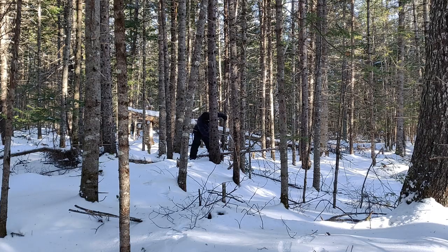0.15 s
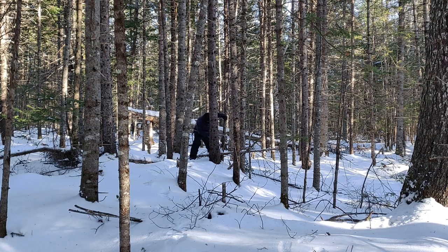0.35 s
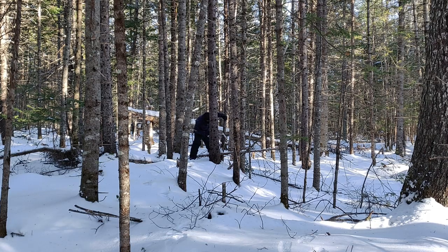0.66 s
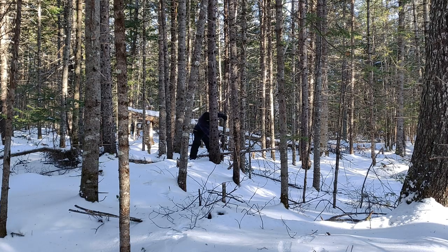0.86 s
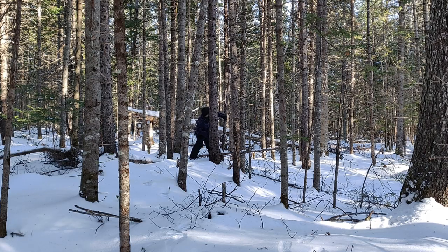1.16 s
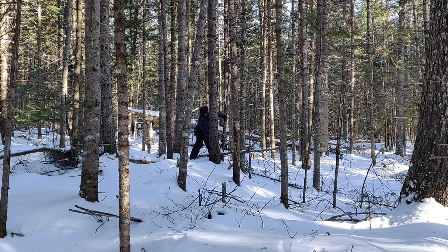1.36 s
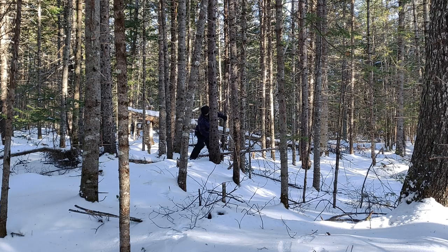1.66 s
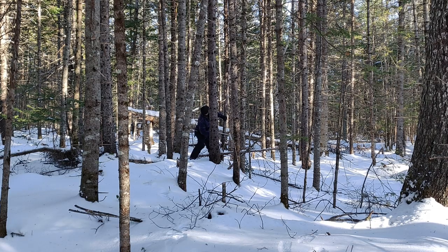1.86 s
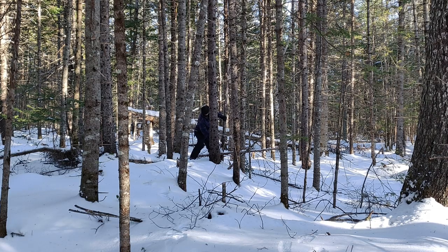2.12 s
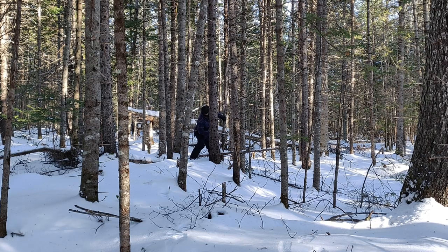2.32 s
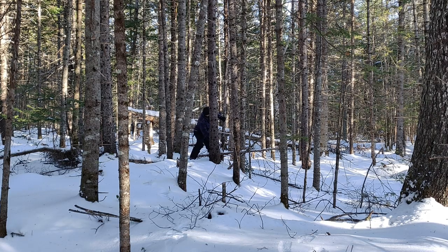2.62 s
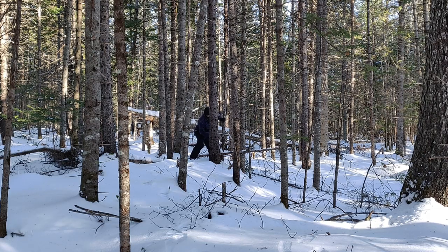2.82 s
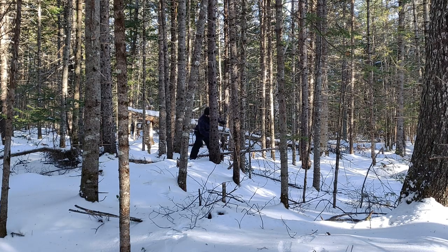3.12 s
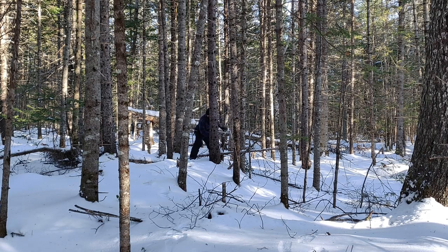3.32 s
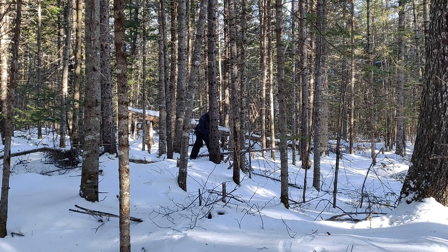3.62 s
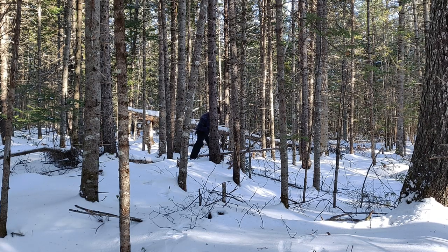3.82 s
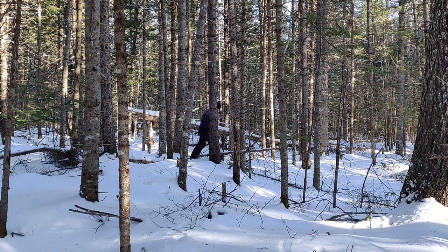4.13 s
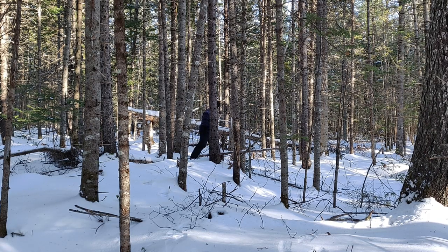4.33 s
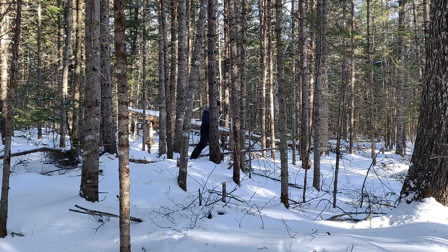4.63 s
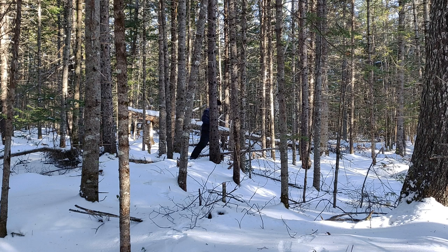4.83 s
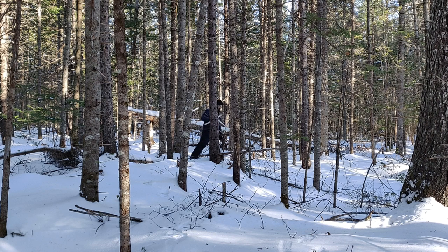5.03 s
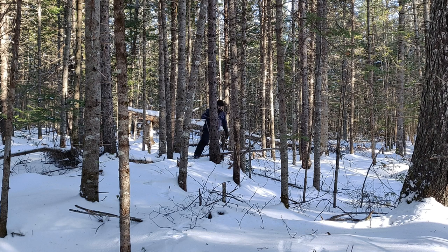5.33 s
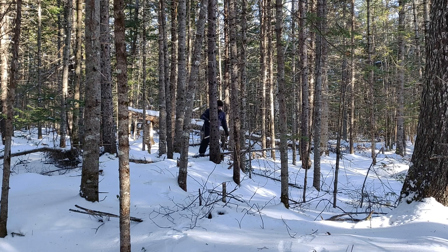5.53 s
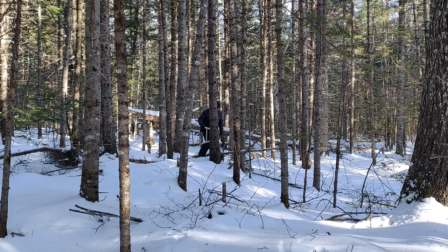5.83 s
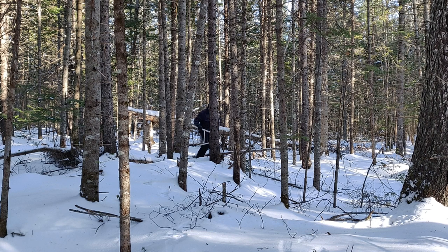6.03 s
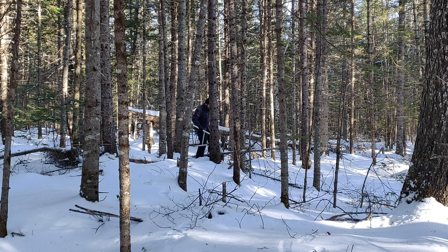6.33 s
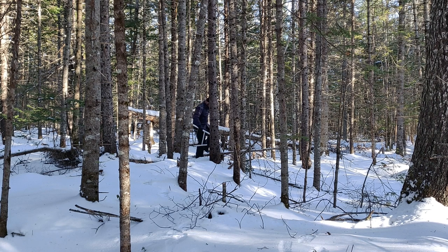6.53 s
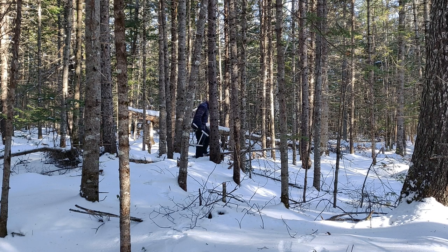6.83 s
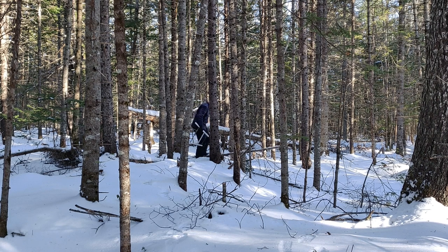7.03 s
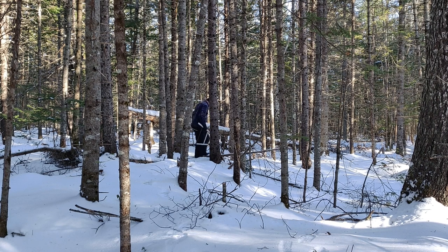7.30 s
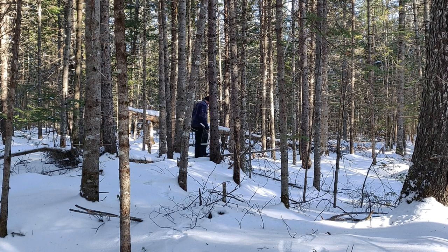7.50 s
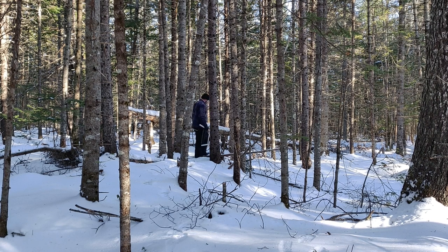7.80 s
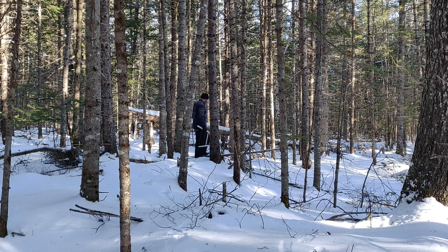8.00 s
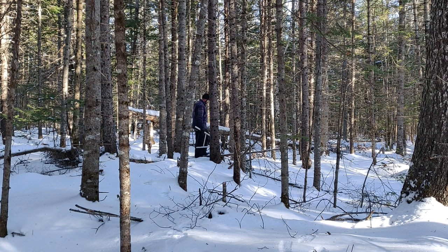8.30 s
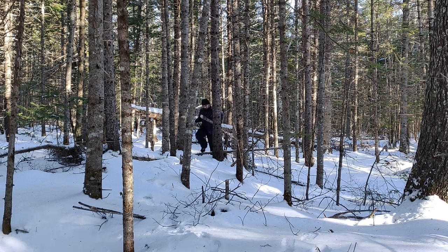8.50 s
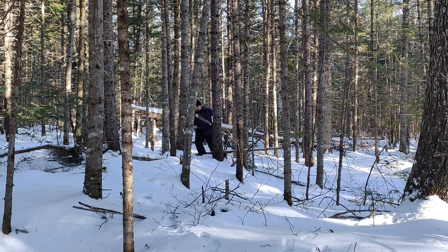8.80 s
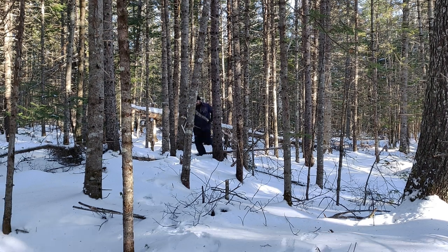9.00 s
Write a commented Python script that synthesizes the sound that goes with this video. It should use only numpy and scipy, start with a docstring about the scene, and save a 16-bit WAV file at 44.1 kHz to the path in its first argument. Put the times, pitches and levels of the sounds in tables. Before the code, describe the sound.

In a snowy wood, sawing gives way to sharp cracks, a brief creak, a crackling treefall with low thuds, then sparse snow crunches and brushing.

```python
"""A snowy wood, with someone some way off sawing through a thin dead tree in quick strokes of many small fractures.
Fibres snap as short clicks with a ringing splinter; the hinge creaks through the modes of the stem.
The crown crashes through dry branches in bursts of grains and thuds into the snow on decaying ground modes.
Later a piece drops on the crust and boots crunch about. Trunks scatter the sounds back as echoes of noise,
over a faint rush of far-off air; two small microphone ports ring in the treble."""
import sys
import numpy as np
from scipy import signal
from scipy.fft import rfft, irfft, next_fast_len
from scipy.io import wavfile
from scipy.ndimage import uniform_filter1d

SR = 44100
rng = np.random.default_rng(int(sys.argv[2]) if len(sys.argv) > 2 else 0)


def bounce(signal):
    """Save signal as a 16-bit WAV file at the path given by the first command-line argument."""
    frames = np.transpose(np.atleast_2d(signal))
    limited = np.clip(frames, -1, 1)
    pcm = np.round(limited * 32767).astype(np.int16)
    wavfile.write(sys.argv[1], SR, pcm)


N = 403515
T = np.arange(N) / SR  # seconds

# Levels throughout are relative: filters, mixing gains and the microphone come after them.
# Far-off air in the wood. Each row: frequency in Hz, level in dB.
AIR_SPECTRUM = [(20, -33), (45, -36.5), (90, -47), (200, -48), (300, -50.5), (500, -51.5), (1000, -58.5),
                (2000, -70.5), (4000, -89), (6200, -76.5), (16000, -56.5)]

# Saw cycles, a light return stroke and then the cut.
# Each row: start in seconds, return level in dB, cut level in dB.
SAW_CYCLES = [(0.192, -52.5, -45.5), (0.613, -51, -46.5), (1.025, -54.5, -48), (1.442, -56, -52),
              (1.877, -57.5, -53), (2.297, -59, -50), (2.67, -79, -52)]
# Blade and stem under the teeth. Each row: frequency in Hz, gain in dB.
SAW_SPECTRUM = [(100, -32.5), (330, -6.5), (550, -6), (760, 1), (960, -8), (1270, -2), (1500, -6),
                (1850, -3), (3150, -17), (3900, -13.5), (4600, -10.5), (6200, -8.5), (8500, -7.5),
                (16000, -11.5)]
# Resonances of the stem under the saw. Each row: frequency in Hz, width in Hz, gain in dB.
STEM_RESONANCES = [(453, 64, -15), (720, 27, -25), (1230, 60, -4.5), (1600, 69, -3.5), (1810, 25, -28),
                   (2420, 170, -14.5), (3980, 33, -0.5)]
RETURN_RISE_S, RETURN_FALL_S = 0.045, 0.17
CUT_AFTER_S, CUT_RISE_S, CUT_FALL_S = 0.21, 0.097, 0.086
RUB_DB, RUB_FADE_DB_PER_S, RUB_LEAST_DB = -57.5, 5.5, -64.5  # the blade rubs less as the cut opens
ONSET_S, RELEASE_DB_PER_S = 0.0064, 188  # of all rubbing, bending and wading

# Snapping wood. Each row: start in seconds, burst level in dB, woody body in dB,
# splinter pitch in Hz, splinter level in dB; body and splinter are relative to the burst.
WOOD_SNAPS = [(1.0519, -34.5, -13.5, 1600, -4), (1.4254, -26, -24.5, 3830, -4),
              (1.75, -24.5, -19.5, 1780, 4), (2.1004, -29.5, -21, 1820, 1), (2.149, -15.5, -19, 1890, 3),
              (2.3708, -32.5, -31, 1680, -10), (2.511, -15.5, -19, 1600, -4), (2.7618, -29, -20, 4800, 7),
              (2.7853, -11, -23.5, 4410, 1.5), (2.9412, -21.5, -20.5, 4770, -0.5),
              (3.0056, -33.5, -19, 4670, 6), (3.075, -25.5, -22, 4140, -26),
              (3.2037, -35.5, -16.5, 4320, 13.5), (3.2435, -29, -20, 4890, -18),
              (3.337, -20, -21, 4070, -7), (3.3593, -14, -28, 4630, -20), (3.484, -16.5, -31, 4500, -15),
              (3.5073, -17, -40, 4790, -20), (3.5945, -15, -30, 4830, -20),
              (3.7187, -24.5, -16.5, 4890, -9), (3.7687, -20, -23, 4600, -11), (3.8094, -22, -20, 4500, -4),
              (3.8832, -25, -22, 3600, 6.5), (3.9491, -13, -17.5, 5100, -2), (3.9618, -26, -18, 4450, -4),
              (4.0177, -25.5, -29, 4500, 9), (4.0303, -17.5, -33, 2720, -1), (4.211, -37, -14, 4000, 5),
              (4.2993, -36, -23, 3390, 4), (5.0809, -44, -16, 1640, -6), (5.1382, -45, -19, 1730, -7),
              (5.5832, -46, -21, 4400, -1), (6.3165, -46.5, -26, 4720, -6), (7.0838, -28.5, -25, 1910, -8),
              (7.1035, -27.5, -13, 1450, -3), (7.1192, -22.5, -14.5, 1850, -2),
              (7.1495, -17.5, -23.5, 2190, -9), (7.5004, -47.5, -12, 4800, -6),
              (8.7695, -24.5, -45, 4970, -9), (8.926, -35.5, -25, 4870, -14), (8.9936, -41.5, -19, 4670, 6),
              (9.0457, -34, -21, 4700, 4.5), (9.0979, -32.5, -24, 4800, -9),
              (9.1424, -29, -22.5, 4400, -12)]
# The sharp edge of a snap. Each row: frequency in Hz, gain in dB.
SNAP_EDGE_SPECTRUM = [(500, -40), (2000, -17), (3200, -10), (4500, -2.5), (6200, 3.5), (9000, 0),
                      (16000, -7)]
# The wood behind the edge. Each row: frequency in Hz, gain in dB.
SNAP_BODY_SPECTRUM = [(50, -25), (150, -2.5), (300, -19.5), (700, -3), (1800, -3), (2800, -5.5),
                      (5000, -18.5), (16000, -80)]
TEAR_S = 0.0023  # time for the fibres beside a break to let go

# Jolts of the stem, heavy blows and footfalls, all felt through the ground.
# Each row: start in seconds, level in dB, hardness in dB per octave of mode pitch about 50 Hz.
GROUND_BLOWS = [(2.15, -67.5, 18), (2.515, -67.5, 16.5), (2.787, -66.5, 15.5), (3.626, -46.5, 6),
                (3.961, -45, -1.5), (3.997, -45.5, 0.5), (6.12, -57.5, 8), (6.825, -53.5, 4),
                (7.108, -56.5, 12), (7.153, -58.5, 11), (7.221, -60, -3), (8.69, -58, 8)]
# Modes of the ground. Each row: frequency in Hz, level in dB at zero hardness, 60 dB decay time in seconds.
GROUND_MODES = [(34.9, 5, 0.84), (43.5, 4.5, 0.52), (80, 5, 0.14), (110, -2, 0.2), (166.7, -9.5, 0.13)]

# Modes of the creaking stem. Each row: frequency in Hz, level in dB, 60 dB decay time in seconds.
STEM_MODES = [(324, -6, 0.076), (382, 6, 0.13), (452, 14, 0.065), (530, -9, 0.056)]
# The tree gives way: the hinge bends from then on, until the stem lies on its branches.
GIVES_S, HINGE_ENDS_S, HINGE_DB = 3.24, 3.72, -57.5

# Boughs of the crown striking dry branches, then settling. Each row: moment of full level in seconds, level in dB.
BOUGH_STRIKES = [(3.27, -43.5), (3.38, -37.5), (3.49, -39), (3.61, -40.5), (3.68, -39.5), (3.75, -44),
                 (3.96, -36), (4.33, -56.5), (4.62, -65)]
# Breaking twigs, bark and needles. Each row: frequency in Hz, gain in dB.
TWIG_SPECTRUM = [(60, -5), (250, 5.5), (380, 7), (900, 4.5), (1600, 2.5), (3000, -1), (4500, -1.5),
                 (6300, 3), (9000, 2.5), (16000, -0.5)]
CRASH_ATTACK_S, CRASH_DECAY_DB_PER_S = 0.034, 98

# Snow crust giving way. Each row: moment of full level in seconds, level in dB.
CRUST_BREAKS = [(5.08, -67.5), (5.14, -61.5), (5.52, -66), (5.77, -68.5), (6.09, -60), (6.135, -59),
                (6.32, -69), (6.825, -56.5), (7.055, -60), (7.1, -46.5), (7.118, -41.5), (7.142, -41),
                (7.213, -46)]
# Icy crust. Each row: frequency in Hz, gain in dB.
CRUST_SPECTRUM = [(60, -7), (120, -10), (280, -0.5), (380, 8), (1000, 4), (1900, 3), (2900, 0),
                  (6000, -0.5), (9000, 0.5), (16000, -7)]
# Boots and clothes brushing by. Each row: frequency in Hz, gain in dB.
BRUSH_SPECTRUM = [(100, -5), (700, 12.5), (2000, 6.5), (4500, 4), (9000, 7), (16000, 5)]
CRUNCH_ATTACK_S, CRUNCH_DECAY_DB_PER_S = 0.022, 186
# Boots and clothes brush through snow and twigs from here on.
WADING_S, WADING_DB = 8.458, -61.5

# The microphones' own hiss. Each row: frequency in Hz, level in dB.
HISS_SPECTRUM = [(100, -52.5), (2000, -62), (5000, -60), (7000, -65), (9000, -66.5), (16000, -78.5)]
# Left microphone port with its own resonance. Each row: frequency in Hz, gain in dB.
LEFT_PORT_RESPONSE = [(2500, 4.5), (4400, 7), (5400, 15.5), (5850, 17.5), (6300, 20.5), (6900, 10.5),
                      (8000, 1.5), (9000, -7), (10200, -18), (16000, -24.5)]
# Right microphone port with its own resonance. Each row: frequency in Hz, gain in dB.
RIGHT_PORT_RESPONSE = [(2500, -2.5), (5000, -2.5), (7000, 3.5), (8400, 3), (9300, 1.5), (10300, -16),
                       (16000, -49.5)]
# Airy treble heard in the centre. Each row: frequency in Hz, gain in dB.
CENTRE_TREBLE_RESPONSE = [(6000, -62), (9500, -34), (11000, -21), (13000, -10), (15700, -8.5)]
TOP_HZ = 16100  # upper edge of the band that is kept


def undb(db):
    """Decibels to gain."""
    return 10 ** (np.asarray(db) / 20)


def colour(x, points):
    """Causal (minimum-phase) filter through (Hz, dB) points, built from the cepstrum."""
    size = next_fast_len(N + SR // 2, real=True) // 2 * 2
    hz, db = np.transpose(points)
    bins_hz = np.arange(size // 2 + 1) * SR / size
    gain = undb(np.interp(np.log(bins_hz + 1), np.log(hz), db))
    # fold the cepstrum onto positive time
    cepstrum = irfft(np.log(gain))
    cepstrum[1:size // 2] *= 2
    cepstrum[size // 2 + 1:] = 0
    response = np.exp(rfft(cepstrum))
    return irfft(rfft(x, size) * response)[..., :N]


def resonate(x, hz, width_hz):
    """One resonance, gain 1 at its centre."""
    b, a = signal.iirpeak(hz, hz / width_hz, SR)
    return signal.lfilter(b, a, x)


def ring(modes):
    """One second of decaying modes, given as (Hz, dB, 60 dB decay time in seconds)."""
    t = T[:SR]
    out = np.zeros(SR)
    for hz, db, t60 in modes:
        out += undb(db) * np.sin(2 * np.pi * hz * t) * np.exp(-np.log(1000) * t / t60)
    return out


def add(out, s, sound):
    """Mix a sound in at time s."""
    i = int(s * SR)
    out[i:i + len(sound)] += sound[:max(N - i, 0)]


def grains(rate, spread_db):
    """Tiny fractures of either sign at random moments, rate per second, of uneven strength; rms 1."""
    chance = rng.uniform(-1, 1, N) * SR / rate
    hits = np.flatnonzero(abs(chance) < 1)
    rarity = np.minimum(-np.log(abs(chance[hits])), np.pi)
    x = np.zeros(N)
    x[hits] = np.sign(chance[hits]) * undb(spread_db * rarity)
    return x / np.std(x)


def flicker(rate, depth_db):
    """A gain that wanders at random about 1, with rate new targets per second."""
    hold = max(int(SR / rate), 2)  # samples
    steps = rng.standard_normal(N)[np.arange(N) // hold]
    return undb(depth_db * uniform_filter1d(steps, hold))


def flurries(rate, depth_db):
    """Brittle bits of every size, each size ringing at its own pitch and breaking in its own spurts."""
    out = np.zeros(N)
    for hz in np.geomspace(700, 8000, num=9):
        bits = grains(rate, spread_db=0.5) * flicker(rate=90, depth_db=depth_db)
        out += resonate(bits, hz, width_hz=hz / 4)
    return out


def held(start_s, end_s):
    """Gain of a sustained action: quick onset, hold, release."""
    onset = np.clip((T - start_s) / ONSET_S, 0, 1)
    return onset * undb(-RELEASE_DB_PER_S * np.maximum(T - end_s, 0))


def bursts(rows, attack_s, decay_db_per_s):
    """Gain of (s, dB) blows that each rise to their moment and die away; they add in power."""
    t = T[:SR]
    shape = np.minimum(t / attack_s, 1) * undb(-decay_db_per_s * np.maximum(t - attack_s, 0))
    power = np.zeros(N)
    for s, db in rows:
        add(power, s - attack_s, (undb(db) * shape) ** 2)
    return np.sqrt(power)


def swing(start_s, rise_s, fall_s):
    """Speed of the blade through one stroke, 0-1."""
    peak_s = start_s + rise_s
    phase = np.interp(T, [start_s, peak_s, peak_s + fall_s], [0, 0.5, 1])
    return np.sin(np.pi * phase).clip(0)


def air():
    """A faint, steady rush of noise from far off, more alike than different on the two sides."""
    rush = rng.standard_normal(N) + 0.77 * rng.standard_normal((2, N))
    return undb(-2.5) * colour(rush, AIR_SPECTRUM)


def saw():
    """Teeth tear fibres; they come faster and bite louder as the blade speeds up in each stroke."""
    first_s = SAW_CYCLES[0][0]
    rub_db = np.maximum(RUB_DB - RUB_FADE_DB_PER_S * (T - first_s), RUB_LEAST_DB)
    force = held(first_s, GIVES_S) * undb(rub_db)
    speed = np.zeros(N)
    for s, return_db, cut_db in SAW_CYCLES:
        back = swing(s, RETURN_RISE_S, RETURN_FALL_S)
        cut = swing(s + CUT_AFTER_S, CUT_RISE_S, CUT_FALL_S)
        speed += back + cut
        force = np.hypot(force, undb(return_db) * back + undb(cut_db) * cut)
    fractures = grains(rate=1800 * (0.31 + speed), spread_db=-1.5)
    teeth = force * fractures * flicker(rate=120, depth_db=2.5)
    stem = sum(undb(db) * resonate(teeth, hz, width) for hz, width, db in STEM_RESONANCES)
    return undb(4.5) * colour(teeth, SAW_SPECTRUM) + undb(2.5) * stem


def forest(x, near_db, near_t60, far_db, far_t60):
    """Near trunks return a quick spray of echoes, far ones a soft tail; each side hears its own."""
    out = []
    for side in range(2):
        near = grains(rate=3000, spread_db=-0.5) * np.exp(-np.log(1000) * T / near_t60)
        far = rng.standard_normal(N) * np.exp(-np.log(1000) * T / far_t60)
        far *= 1 - np.exp(-T / 0.041)  # the tail builds up softly
        echoes = undb(near_db) * near / np.linalg.norm(near) + undb(far_db) * far / np.linalg.norm(far)
        # long waves bend round the trunks; bark and air soak up the shortest
        echoes = colour(echoes, [(100, -7.0), (500, -4), (1500, 0.5), (6500, -1.5), (15000, -1.5)])
        out.append(signal.fftconvolve(x, echoes)[:N])
    return np.array(out)


def snaps():
    """A few fibres give, the bundle breaks, its neighbours tear; the freed splinter rings at its own pitch.

    Returns the sound straight ahead and the sound sent into the wood, where all directions
    average to a clean click."""
    edge, body, rings = np.zeros((3, 2, N))
    t = T[:SR // 20]
    fibres, stragglers = grains(rate=9000, spread_db=4.0), grains(rate=520, spread_db=4.5)
    breaks = SR // 1500  # samples from first give to break
    click = signal.unit_impulse(len(t), breaks)
    age = t / TEAR_S
    for k, (s, db, body_db, hz, ring_db) in enumerate(WOOD_SNAPS):
        own = slice(k * len(t), (k + 1) * len(t))  # each snap has its own fibres
        # the last fibres hold on about twice as long as the rest
        tear = 0.17 * fibres[own] * np.exp(-age) + 0.098 * stragglers[own] * np.exp(-age / 2.1)
        tear *= np.minimum(t / t[breaks], 1)
        for path, burst in enumerate([click + tear, click]):  # ahead, then into the wood
            burst = burst * undb(db) / np.linalg.norm(burst)
            add(edge[path], s, burst)
            add(body[path], s, burst * undb(body_db))
            add(rings[path], s, resonate(burst, hz, width_hz=hz / 8) * undb(ring_db))
    edge = undb(9.5) * colour(edge, SNAP_EDGE_SPECTRUM)
    body = undb(34.5) * colour(body, SNAP_BODY_SPECTRUM)
    return edge + body + undb(14) * rings


def thuds():
    """Snow cushions each blow; a harder one brings out the ground's upper modes."""
    out = np.zeros(N)
    cushion = 1 - np.exp(-T[:SR] / 0.0043)
    for s, db, hard_db in GROUND_BLOWS:
        modes = [(hz, mode_db + hard_db * np.log2(hz / 50), t60) for hz, mode_db, t60 in GROUND_MODES]
        add(out, s, undb(db) * ring(modes) * cushion)
    return out


def creak():
    """The hinge of uncut wood sticks and slips, ringing the stem."""
    x = signal.fftconvolve(grains(rate=150, spread_db=-2), ring(STEM_MODES))[:N]
    return x / np.std(x) * undb(HINGE_DB) * held(GIVES_S, HINGE_ENDS_S)


def crash():
    """Bark and needles crackle as the crown comes down; twigs break in flurries over them."""
    crackle = grains(rate=1200, spread_db=3.0) * flicker(rate=45, depth_db=2.5)
    twigs = flurries(rate=170, depth_db=5.5)
    strikes = bursts(BOUGH_STRIKES, CRASH_ATTACK_S, CRASH_DECAY_DB_PER_S)
    return colour((undb(-7) * crackle + undb(-8.0) * twigs) * strikes, TWIG_SPECTRUM)


def crunches():
    """The icy crust collapses in quick bursts of grains; wading boots brush it lightly."""
    crust = grains(rate=3500, spread_db=4.5) * flicker(rate=130, depth_db=5.5)
    crust += undb(-5.5) * flurries(rate=360, depth_db=1)
    crust *= bursts(CRUST_BREAKS, CRUNCH_ATTACK_S, CRUNCH_DECAY_DB_PER_S)
    brush = grains(rate=2500, spread_db=4.0) + undb(-6) * flurries(rate=210, depth_db=6)
    brush *= undb(WADING_DB) * held(WADING_S, T[-1])
    return undb(-3.0) * colour(crust, CRUST_SPECTRUM) + undb(-8.5) * colour(brush, BRUSH_SPECTRUM)


def scene():
    """The stump and the place where the crown lands each reach the listener straight and by their own echoes."""
    stump = saw() + creak()
    landing = crash() + crunches()
    snaps_ahead, snaps_around = snaps()
    echoes = forest(stump + snaps_around, near_db=-3.0, near_t60=0.36, far_db=-12, far_t60=1.0)
    echoes += forest(landing, near_db=-1.5, near_t60=0.23, far_db=-7, far_t60=0.91)
    return stump + landing + snaps_ahead + echoes + thuds() + air()


def record(dry):
    """The ports ring at different pitches; hiss joins; deep bass is cut, loud peaks rounded, the top cut."""
    sound = np.array([colour(dry[0], LEFT_PORT_RESPONSE), colour(dry[1], RIGHT_PORT_RESPONSE)])
    sound += colour(dry[0], CENTRE_TREBLE_RESPONSE)  # treble placed in the centre
    sound += colour(rng.standard_normal((2, N)), HISS_SPECTRUM)
    bass_cut = signal.butter(2, 27, "highpass", fs=SR, output="sos")
    sound = signal.sosfilt(bass_cut, sound)
    sound = 0.65 * np.tanh(sound / 0.65)
    top_cut = signal.ellip(10, 0.2, 70, TOP_HZ, fs=SR, output="sos")
    return signal.sosfilt(top_cut, sound)


dry = scene()
out = record(dry)
bounce(out)
```